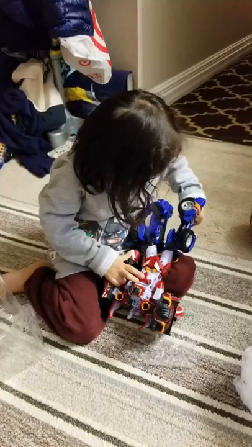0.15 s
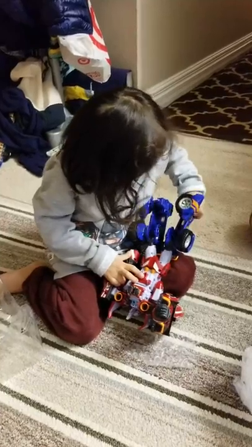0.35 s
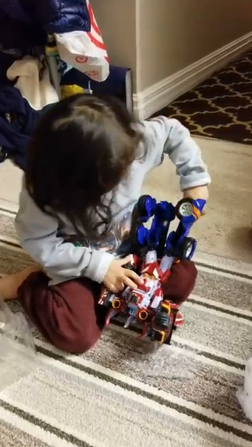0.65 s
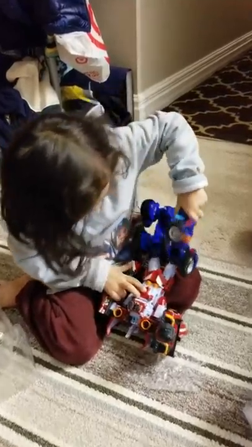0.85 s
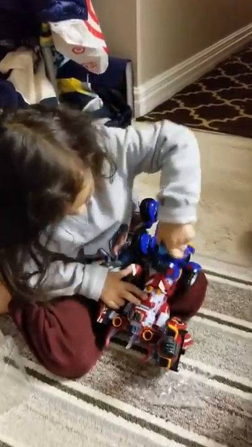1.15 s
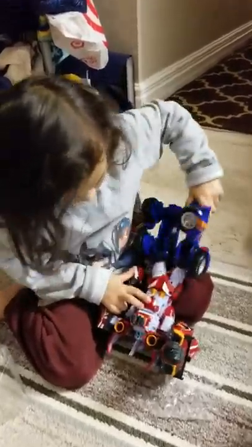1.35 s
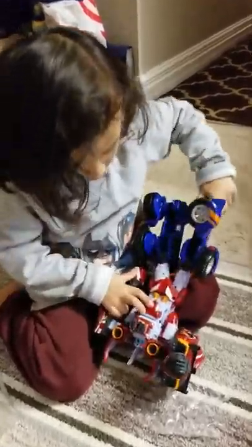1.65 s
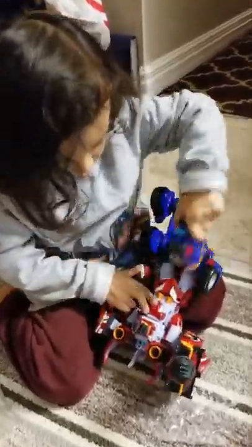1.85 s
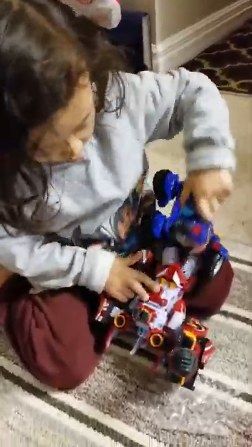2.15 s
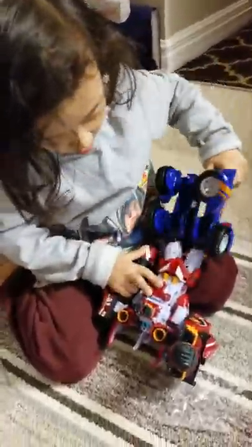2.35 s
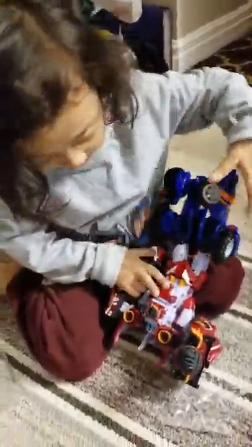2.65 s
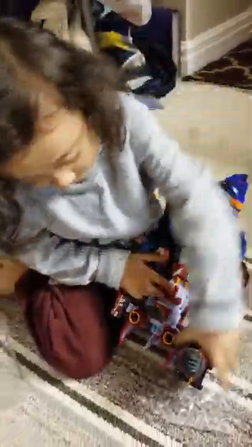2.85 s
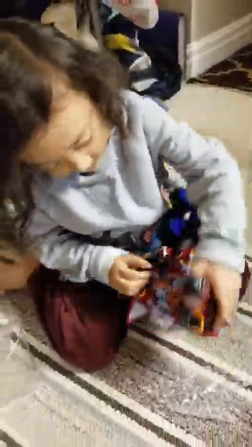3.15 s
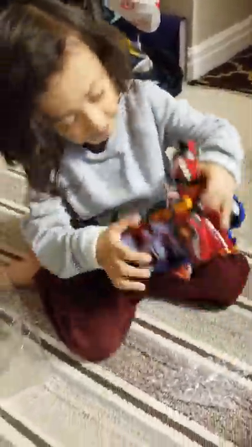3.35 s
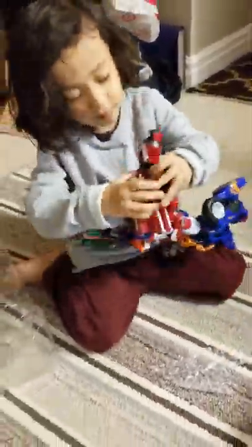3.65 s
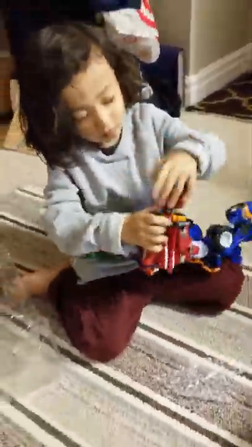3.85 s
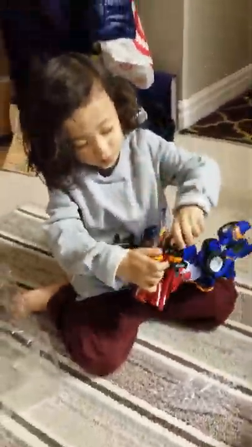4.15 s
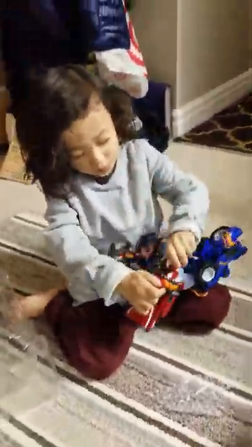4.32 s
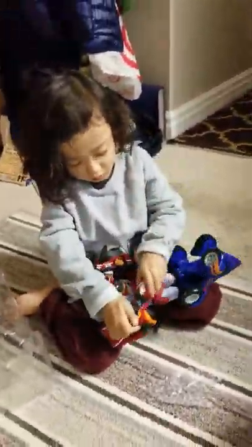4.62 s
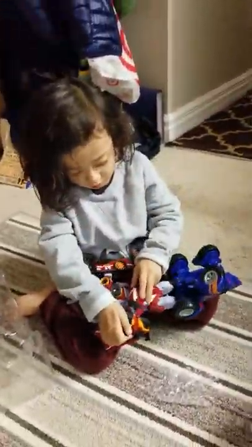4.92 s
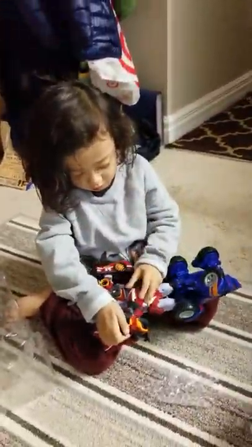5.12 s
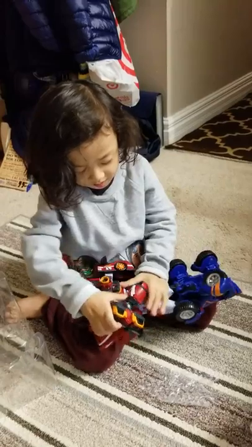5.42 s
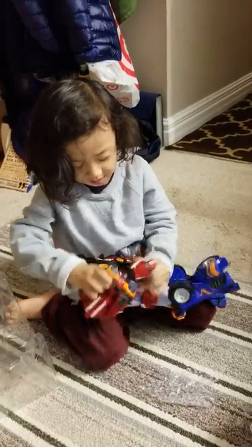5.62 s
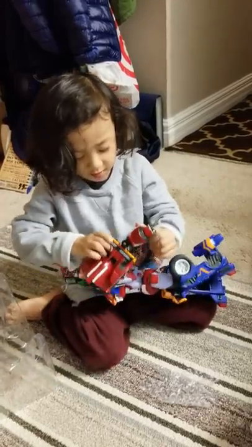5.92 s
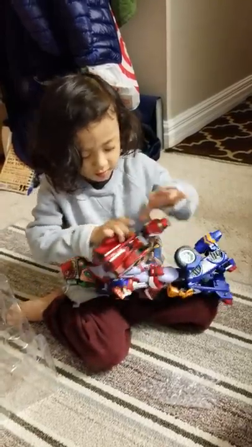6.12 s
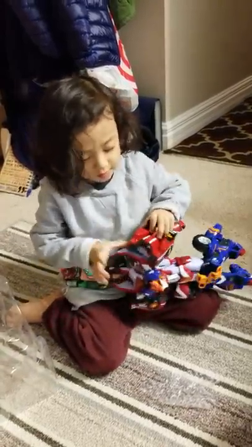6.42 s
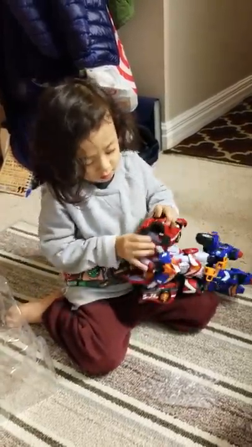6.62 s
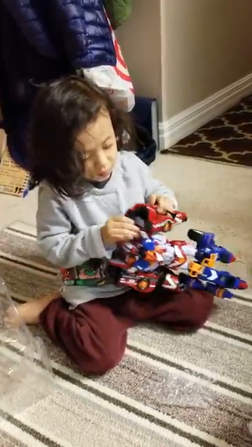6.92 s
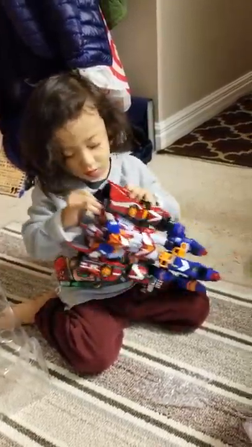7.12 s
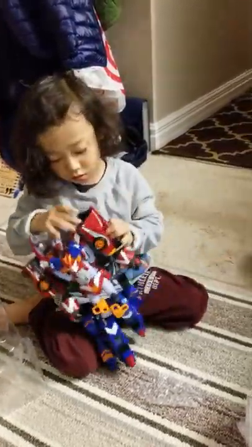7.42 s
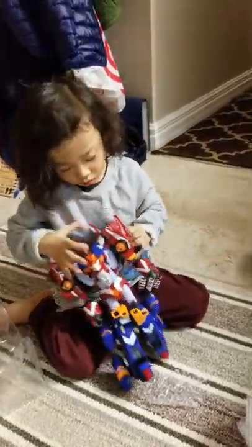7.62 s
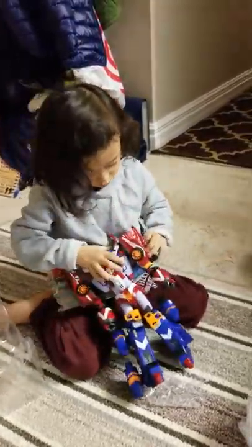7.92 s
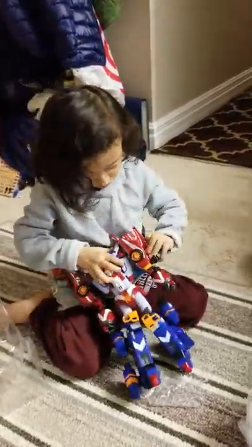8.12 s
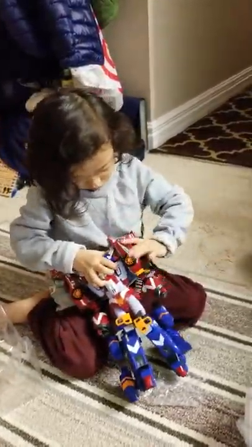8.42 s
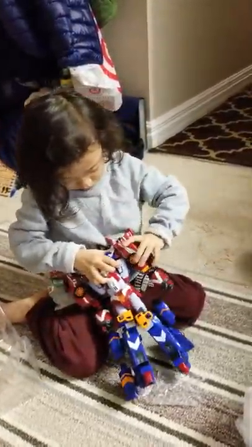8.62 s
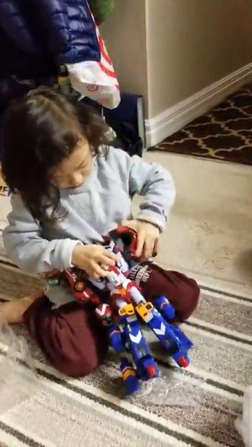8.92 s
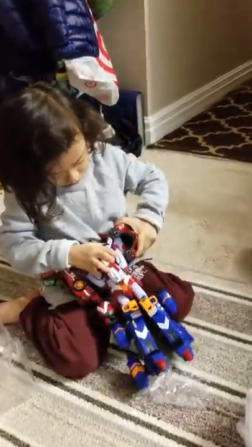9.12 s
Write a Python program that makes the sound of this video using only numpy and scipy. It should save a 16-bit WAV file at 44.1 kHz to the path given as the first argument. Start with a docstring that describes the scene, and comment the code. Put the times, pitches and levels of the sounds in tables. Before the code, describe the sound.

A hard plastic toy robot is handled about a metre from the microphone in a small, quiet room with little echo and a faint low hum. From about 0.6 to 2.3 seconds its ratchet joints click in several quick runs, each click crisp, with a hollow ring and a slight rattle. Between 2.8 and 3.8 seconds sleeves rub softly on the plastic and panels knock dully as the toy is turned. Sharp snaps of catches and hinges cluster from 4.1 to 4.6 seconds. After a lull, another tight burst comes at 5.6 to 5.8 seconds. From 6.2 to 7.8 seconds there are lighter clicks, knocks and a jiggle of loose parts, with more sleeve rustle. A few faint ticks lead to a last flurry of snaps from 8.5 to 8.8 seconds and two clicks at around 9.1 seconds.

```python
"""A quiet, carpeted room; about a metre from a phone's two microphones a child folds a plastic toy robot.
Ratchet joints step, panels knock and catches snap: each contact cracks, rings the hard, hollow shell
and shakes loose parts. Sleeves rub on the toy as it is turned in the hands. The small room answers
with two close echoes and a short tail; room tone and a faint mains hum lie underneath."""
import sys
import numpy as np
from scipy import signal
from scipy.fft import rfft, irfft, next_fast_len
from scipy.io import wavfile
from scipy.ndimage import uniform_filter1d

SR = 44100
rng = np.random.default_rng(int(sys.argv[2]) if len(sys.argv) > 2 else 0)


def transcribe(signal):
    """Save signal, clipped to [-1, 1], as a 16-bit WAV file at the path in sys.argv[1]."""
    frames = np.atleast_2d(signal).T
    limited = np.clip(frames, -1, 1)
    pcm = np.round(limited * 32767).astype(np.int16)
    wavfile.write(sys.argv[1], SR, pcm)


N = 408807

# colour of the room tone: (frequency [Hz], gain [dB])
AIR_COLOUR = [(15, -44.5), (25, -14), (117, -4.5), (149, -12), (263, -25.5), (301, -20.5), (439, -29.5),
              (962, -34.5), (1100, -29.5), (1740, -31.5), (2480, -41), (8590, -51.5), (14000, -43),
              (16000, -51.5)]
# drift of the room tone: (time [s], relative level [dB])
AIR_DRIFT = [(0.0, -67.5), (1.16, -62.5), (2.04, -66), (4.3, -66), (6.4, -74), (7.5, -68.5), (9.27, -67)]
# colour of a sleeve on plastic: (frequency [Hz], gain [dB])
CLOTH_COLOUR = [(100, 0.5), (250, -6), (600, -6.5), (1000, -6.5), (1900, 4), (3200, -5), (6000, 0),
                (10000, -8), (12700, -6.5), (16000, -14)]
# each fold works another joint or catch, whose voice holds until the next:
# (start [s], treble [dB], struck part's pitch [Hz], its ring [dB], shell re crack [dB],
#  shell centre [Hz], thump re crack [dB], rattle re contact [dB], pan to the left [dB])
FOLDS = [(.5, -3.5, 3200, 5.5, -5, 2134, -27.5, 1, -2), (1.1, -11, 3850, 1.5, -7, 2120, -28, 0, 0),
         (1.7, -10, 5900, -2, -8, 2140, -29.5, 1, -0.5), (2.05, -9, 3800, 2.5, -8.5, 2080, -30, -2, 1),
         (2.7, -9.5, 5320, 4, -6, 1760, -22.5, -4, 0.5), (3.6, -2.5, 4260, 7, -9, 1570, -42, -4, -1.5),
         (4.2, -3, 5700, 2.5, -6.5, 2400, -43.5, -7, 3), (4.4, 2.5, 4080, 10, -6.5, 2420, -50, -18.5, 2),
         (4.56, -7.5, 5750, -2, -7, 2400, -36.5, -10, 1.5),
         (4.63, -2, 5800, 3.5, -8, 2336, -25.5, -10.5, 4.5),
         (4.8, -4.5, 5840, 0, 1.5, 2010, -21.5, -4.5, 21),
         (5.55, -2, 5100, 11.5, -10.5, 1614, -36, -10.5, -0.5),
         (5.65, -1, 4300, 5.5, -9, 1676, -34, -22, 0.5), (6.1, -14, 5800, 2, -1.5, 1894, -26, 1, -0.5),
         (6.8, -7.5, 9570, 6.5, -10, 1980, -40, 1.5, 5.5),
         (7.3, -15.5, 5200, 4.5, 2.5, 2220, -16.5, -7.5, -1.5),
         (7.95, -13, 5460, 8.5, -6.5, 1800, -27.5, 1, -4.5), (8.48, -13, 5760, 1.5, -8, 1784, -26.5, 2, 0),
         (8.62, -2.5, 5800, 6, -11, 2360, -32, -13, 2), (9.0, -3.5, 5220, 1, -16, 2300, -37, -10, 1.5)]
# swings of the ratchet joint: (start [s], teeth [count], first gap [s], middle gap [s], last gap [s])
SWINGS = [(.6018, 11, .063, .038, .0385), (1.1701, 6, .0339, .022, .0228), (1.3692, 2, .0553, .0553, .0553),
          (1.7379, 8, .0188, .0264, .0451), (2.104, 7, .0278, .034, .0377)]
# force of each swing: (relative crack level in mid-swing [dB], thump growth over the swing [dB])
SWING_FORCE = [(-17, -4), (-15, 12), (-13, 7), (-18, -9.5), (-16.5, 13.5)]
# colour of a crack: (frequency [Hz], gain [dB])
CRACK_COLOUR = [(400, -31.5), (900, -24.5), (1300, -11), (2000, -4.5), (2900, -2.5), (3900, -0.5),
                (5000, 1), (6100, 3), (8000, 0), (10000, 1.5), (12300, 3.5), (15000, 2), (16000, -10.5)]
# modes of the hollow panels: (frequency [Hz], width [Hz], relative level [dB])
SHELL_MODES = [(1245, 63, 0), (1408, 180, 3), (1720, 61, -3.5), (1851, 47, -1.5), (1980, 57, -4),
               (2132, 91, -1.5), (2370, 140, -3.5), (2740, 320, -3)]
# low modes of the whole body: (frequency [Hz], width [Hz], relative level [dB])
BODY_MODES = [(120, 120, -10), (300, 150, -6.5), (516, 100, -9.5), (660, 110, -1), (830, 28, -5),
              (950, 120, -5.5)]
# decay of the room: (frequency [Hz], time to fall 60 dB [s])
ROOM_T60 = [(200, 0.59), (800, 0.27), (2000, 0.26), (5500, 0.3), (10000, 0.28), (15000, 0.16)]
# colour of the room's tail: (frequency [Hz], gain [dB])
ROOM_COLOUR = [(200, -3.5), (800, 6), (2000, 2), (5500, 0), (10000, -2), (15000, 1)]
# the toy is turned in the hands: (start [s], length [s], sleeve rub [dB], jiggle of loose parts [dB])
TURNS = [(2.8, 0.53, -58.5, -74), (3.066, 0.36, -59, -62.5), (3.467, 0.37, -61, -60.5),
         (5.425, 0.22, -66, -70.5), (6.187, .24, -76.5, -54), (6.9, 0.35, -70.5, -47.5),
         (7.321, 0.48, -57, -55), (8.19, 0.1, -66.5, -69.5), (8.476, 0.23, -65, -62)]
# dull knocks of the panels: (time [s], relative shell level [dB], shell centre [Hz])
KNOCKS = [(2.854, -36.5, 1680), (3.1067, -37, 1720), (3.2135, -31, 1930), (3.3028, -39, 2080),
          (3.3324, -38, 2150), (3.5399, -49, 1910), (3.6546, -50, 1270), (3.7991, -30, 2080),
          (4.0365, -50, 1847), (6.4108, -35.5, 1946), (7.206, -39.5, 1760), (7.2506, -57, 1920),
          (7.3348, -25.5, 1980), (7.6078, -38, 1800), (7.6755, -29.5, 1990), (7.9069, -56.5, 1490),
          (8.2154, -44.5, 1890), (8.5599, -39.5, 2000), (8.8035, -30.5, 1970)]
# catches and hinges snapping: (time [s], relative crack level [dB])
SNAPS = [(2.89, -29), (2.9074, -50), (3.2134, -44.5), (3.7384, -26.5), (3.7477, -36), (3.7691, -27),
         (4.0971, -30.5), (4.1803, -27.5), (4.223, -16.5), (4.2629, -17.5), (4.3248, -28.5), (4.3413, -18),
         (4.4182, -17), (4.4535, -16), (4.5367, -26), (4.5762, -18), (4.6177, -17.5), (4.6353, -18),
         (4.9354, -67.5), (5.3599, -60), (5.4636, -46.5), (5.5994, -17.5), (5.61, -15.5), (5.6178, -17),
         (5.629, -16), (5.6556, -17.5), (5.678, -17.5), (5.7285, -17), (5.772, -17.5), (6.1968, -38.5),
         (6.2368, -38), (6.3115, -22), (6.3434, -41), (6.485, -55), (6.897, -35), (6.9955, -28),
         (7.0668, -25), (7.1598, -29), (7.3348, -33.5), (7.3689, -33), (7.3857, -35.5), (7.4432, -38.5),
         (7.4644, -33.5), (7.5016, -43.5), (7.6653, -36.5), (7.7088, -42), (7.7591, -47), (7.8145, -60),
         (8.0536, -62.5), (8.1378, -57.5), (8.245, -54.5), (8.4127, -56), (8.4595, -56.5), (8.4972, -25.5),
         (8.5588, -43.5), (8.653, -31.5), (8.6873, -17.5), (8.7095, -31), (8.725, -24), (8.7359, -22),
         (8.7498, -24), (8.762, -23), (8.7824, -25.5), (8.804, -30), (9.0982, -27), (9.123, -25.5)]
# the left microphone's colour over the right's: (frequency [Hz], gain [dB])
MIC_BALANCE = [(700, 2), (1290, -5), (2300, 1.5), (4400, 0), (8100, 5), (15000, 3.5)]

CONTACTS = sum(row[1] for row in SWINGS) + len(SNAPS) + len(KNOCKS)
CONTACT_SAMPLES, ROOM_SAMPLES = 3072, 18432
CONTACT_HZ = np.fft.rfftfreq(CONTACT_SAMPLES, 1 / SR)


def undb(db):
    """Decibels to gain."""
    return 10 ** (np.asarray(db) / 20)


def colour(points, hz):
    """Gain of a (frequency [Hz], gain [dB]) outline at the given frequencies."""
    f, db = np.transpose(points)
    return undb(np.interp(np.log(hz + 1), np.log(f), db))


def unit(x):
    """Scale to unit energy along time."""
    return x / np.sqrt(np.sum(x ** 2, axis=-1, keepdims=True) + 1e-18)


def tint(x, points):
    """Filter by a (frequency [Hz], gain [dB]) outline."""
    size = next_fast_len(x.shape[-1])
    gain = colour(points, np.fft.rfftfreq(size, 1 / SR))
    return irfft(rfft(x, size) * gain, size)[..., :x.shape[-1]]


def place(times, sounds):
    """Lay stereo sounds on the time line."""
    out = np.zeros((2, N + sounds.shape[-1]))
    for start, sound in zip(np.clip(times * SR, 0, N).astype(int), sounds):
        out[:, start:start + sound.shape[-1]] += sound
    return out[:, :N]


def room_tone(hum_hz=116.3, hum_db=-74.5, alike_hz=450):
    """Low rumble, alike at both microphones, with thin unrelated hiss and a mains hum."""
    t = np.arange(N) / SR
    mid, side = rng.standard_normal((2, N))
    side = tint(side, [(alike_hz / 4, -11), (alike_hz, -5), (alike_hz * 3, 0)])
    air = unit(tint(np.array([mid + side, mid - side]), AIR_COLOUR)) * np.sqrt(N)
    air_db = np.interp(t, *np.transpose(AIR_DRIFT)) + 1
    hum = np.sqrt(2) * np.sin(2 * np.pi * hum_hz * t)
    return undb(air_db) * air + undb(hum_db) * hum


def sleeves(grain_db=2, slip_db=3, grain_samples=400):
    """Cloth slides over plastic with a soft, uneven swish that catches quickly and slips slowly."""
    catches, slips = (uniform_filter1d(np.repeat(rng.standard_normal(N // k + 1), k), k)[:N]
                      for k in (grain_samples, 10 * grain_samples))
    friction = rng.standard_normal((2, N)) * undb(grain_db * catches + slip_db * slips)
    return unit(tint(friction, CLOTH_COLOUR)) * np.sqrt(N)


def fold_at(times):
    """Index of the fold that is under way."""
    return np.searchsorted([row[0] for row in FOLDS], times) - 1


def voiced(times, db, weight_db=0):
    """Contacts of one fold: harder ones are brighter, more crack than body; weight adds thump, rattle."""
    fold = FOLDS[fold_at(times[0])]
    _, treble_db, part_hz, part_db, shell_db, shell_hz, thump_db, rattle_db, pan_db = fold
    force_db = db - np.mean(db)
    treble_db = treble_db + .3 * force_db
    shell_db = db + shell_db - .083 * force_db
    thump_db = db + thump_db + weight_db - .4 * force_db
    rattle_db = rattle_db + .74 * weight_db - .32 * force_db
    return np.broadcast_arrays(times, db, treble_db, part_hz, part_db,
                               shell_db, shell_hz, thump_db, rattle_db, pan_db)


def ratchet(ease_db=4):
    """The pawl drops over tooth after tooth as the joint changes speed smoothly, hardest in mid-swing."""
    swings = []
    for (start, teeth, *gaps_s), (peak_db, growth_db) in zip(SWINGS, SWING_FORCE):
        gaps = np.polyval(np.polyfit([-1, 0, 1], gaps_s, 2), np.linspace(-1, 1, teeth - 1))
        times = start + np.cumsum(np.append(0, gaps))
        along = np.linspace(-1, 1, teeth)
        swings.append(voiced(times, peak_db - ease_db * along ** 2, weight_db=growth_db * along / 2))
    return np.hstack(swings)


def bursts(decay_s, rise_s=.00078, apart=.34, lag_s=.00004):
    """Spectra of one short burst per contact; the microphones hear it partly alike, a moment apart."""
    t = np.arange(CONTACT_SAMPLES // 6) / SR
    noise = rng.standard_normal((CONTACTS, 3, len(t)))
    heard = noise[:, :1] + apart * noise[:, 1:]
    envelope = np.exp(-t / decay_s) * (1 - np.exp(-t / rise_s))
    lag = lag_s * rng.standard_normal((CONTACTS, 1, 1)) * np.array([[1], [-1]]) + 4 * lag_s
    return rfft(heard * envelope, CONTACT_SAMPLES) * np.exp(-2j * np.pi * CONTACT_HZ * lag)


def cracks(strike, treble_db, part_hz, part_db, part_width=.12, shelf_hz=7500):
    """Dense, heavily damped modes of the small struck part, one of which stands out."""
    shelf_db = np.clip(treble_db, -20, 10) / (1 + (shelf_hz / (CONTACT_HZ + 1)) ** 4)
    peak_db = part_db / (1 + ((CONTACT_HZ / part_hz - 1) / part_width) ** 2)
    return unit(irfft(strike * colour(CRACK_COLOUR, CONTACT_HZ) * undb(shelf_db + peak_db)))


def rings(modes, centre_hz, reach_hz, grip=.024, rough=.6):
    """Modes ring from one push and a little scuffing; the spot struck favours those around one pitch."""
    f = CONTACT_HZ[:CONTACT_SAMPLES // 6] + 1
    chance = rng.standard_normal((CONTACTS, 2, len(modes), 1))
    hz, width, db = np.transpose(modes)[:, :, None]
    hz = hz * (1 + grip * chance[:, 0])  # the grip detunes the modes
    weight = np.sign(chance[:, 1]) * undb(db) / np.sqrt(width) / (1 + ((hz - centre_hz) / reach_hz) ** 2)
    radiation = 1 / (1 + (hz / f / 2) ** 6)  # a panel radiates little below its own mode
    ring = np.sum(weight * radiation / (1 + 1j * (f - hz ** 2 / f) / width), axis=1, keepdims=True)
    push = np.exp(-2j * np.pi * f / 1000)  # peaks 1 ms into the contact
    scuff = bursts(decay_s=.0019, apart=.9, lag_s=.00002)[..., :len(f)]
    scuff /= np.std(scuff, axis=-1, keepdims=True)
    return unit(irfft(ring * (push + rough * scuff), CONTACT_SAMPLES))


def rattles(sound, first_s=.005, last_s=.022, fade_s=.012, scatter_db=5, decay_s=.0017, count=6):
    """Loose parts land one after another just after each contact, each a burst, ever more softly."""
    chance = rng.random((CONTACTS, 2, count))
    delay = first_s + (last_s - first_s) * (np.arange(count) + chance[:, 0]) / count
    size = np.exp(-delay / fade_s) * undb(scatter_db * (2 * chance[:, 1] - 1))
    landings = np.zeros((CONTACTS, CONTACT_SAMPLES))
    np.put_along_axis(landings, (delay * SR).astype(int), size, axis=1)
    envelope = signal.lfilter([1], [1, -np.exp(-1 / (decay_s * SR))], landings)[:, None]
    noise = rng.standard_normal((CONTACTS, 3, CONTACT_SAMPLES))
    clatter = unit(envelope * (noise[:, :1] + noise[:, 1:]))
    return irfft(rfft(sound) * rfft(clatter))


def room(sounds, near_s=.0099, wall_s=.0156, build_s=.0013, sway_s=.00021, count=16):
    """Two near surfaces echo over a short diffuse tail; the echoes shift as the toy is moved."""
    t = np.arange(ROOM_SAMPLES) / SR
    hz = np.fft.rfftfreq(len(t), 1 / SR)
    noise = rfft(rng.standard_normal((count, 2, len(t)))) * colour(ROOM_COLOUR, hz)
    centres, t60s = np.transpose(ROOM_T60)
    tail = 0
    for share, t60 in zip(np.eye(len(centres)), t60s):
        band = irfft(noise * np.interp(np.log(hz + 1), np.log(centres), share))
        tail = tail + band * np.exp(-np.log(1000) * t / t60)
    responses = undb(-4.5) * unit(tail * (1 - np.exp(-(t / build_s) ** 2)))
    for response, sway in zip(responses, sway_s * rng.standard_normal(count)):
        response[0, int((near_s + sway) * SR)] += undb(-15)  # nearest surface faces the left microphone
        response[:, int((wall_s - sway) * SR)] += undb(-20)
    return irfft(rfft(sounds, len(t)) * rfft(responses)[np.arange(len(sounds)) % count])


def turning(attack_s=.078, release_s=.06):
    """Gains of the sleeve rub and of the jiggle: each turn of the toy swells, holds and dies away."""
    t = np.arange(N) / SR
    gains = np.zeros((2, N))
    for start, length, *db in TURNS:
        swell = np.clip((t - start) / attack_s, 0, 1)
        fade = np.exp(-np.maximum(t - start - length, 0) / release_s)
        gains = np.maximum(gains, undb(db)[:, None] * swell * fade)
    return gains


def jiggle(taps_per_s=120, scatter_db=5, tick_db=-14, parts=4):
    """Many tiny contacts of a few loose parts tick and ring the panels, each part in its own way."""
    taps = (rng.random((parts, 1, N)) < taps_per_s / parts / SR) * undb(scatter_db * rng.standard_normal(N))
    t = np.arange(CONTACT_SAMPLES) / SR
    hz, width, db = np.transpose(SHELL_MODES)[:, :, None]
    phase = 2 * np.pi * rng.random((parts, 2, len(SHELL_MODES), 1))
    modes = undb(db) * hz / hz.mean() * np.sin(2 * np.pi * hz * t + phase) * np.exp(-np.pi * width * t)
    # panels radiate only around their modes
    ring = tint(modes.sum(axis=2), [(700, -25.5), (1200, 4), (2600, 7.5), (4000, -18.5)])
    tick = rng.standard_normal((parts, 2, len(t))) * np.exp(-t / .003)
    tick = tint(tick, [(1000, -33), (3000, 10), (6500, .5), (14000, -16.5)])
    tapping = signal.oaconvolve(taps, unit(ring) + undb(tick_db) * unit(tick), axes=2)
    return unit(tapping.sum(axis=0)[:, :N]) * np.sqrt(N)


def knocks(treble_db=-12.5, part_hz=4400, part_db=3.5, rattle_db=-11, pan_db=0):
    """Panels bump together: nearly all shell, with little crack or thump."""
    times, shell_db, shell_hz = np.transpose(KNOCKS)
    crack_db, thump_db = shell_db - 13.5, shell_db - 33.5
    return np.array(np.broadcast_arrays(times, crack_db, treble_db, part_hz, part_db,
                                        shell_db, shell_hz, thump_db, rattle_db, pan_db))


def snaps():
    """Catches and hinges snap, each with the voice of the part that is being folded."""
    times, db = np.transpose(SNAPS)
    fold = fold_at(times)
    return np.hstack([voiced(times[fold == k], db[fold == k]) for k in np.unique(fold)])


def toy(facing_db=1.5):
    """Each contact cracks, rings the panels, thumps the body and shakes loose parts; the room answers."""
    contacts = np.hstack([ratchet(), snaps(), knocks()])[:, :, None, None]
    times, crack_db, treble_db, part_hz, part_db, shell_db, shell_hz, thump_db, rattle_db, pan_db = contacts
    # no two contacts are quite alike in colour or direction
    treble_scatter, pitch_scatter, pan_scatter = rng.standard_normal((CONTACTS, 3)).T[:, :, None, None]
    treble_db = treble_db - treble_scatter
    part_hz = part_hz * np.exp(.055 * pitch_scatter)
    pan_db = pan_db - .5 * pan_scatter
    span = np.sqrt(.004 * SR)  # levels are energies spread over 4 ms
    crack = span * undb(crack_db - 1) * cracks(bursts(decay_s=.0014), treble_db, part_hz, part_db)
    # summed over all directions, a crack has the smooth spectrum of a single impulse
    impulse = rfft(signal.unit_impulse(CONTACT_SAMPLES, SR // 1000))
    all_round = span * undb(crack_db - .1) * cracks(impulse, treble_db, part_hz, part_db)
    shell = span * undb(shell_db - 4) * rings(SHELL_MODES, shell_hz, reach_hz=358)
    thump = span * undb(thump_db - 1) * rings(BODY_MODES, centre_hz=645, reach_hz=900)
    loose = undb(rattle_db) * rattles(undb(-6.5) * all_round + undb(3.5) * shell)
    sides = undb(pan_db * np.array([[1], [-1]]) / 2)
    sides = np.sqrt(2) * sides / np.linalg.norm(sides, axis=1, keepdims=True)
    direct = (crack + undb(facing_db) * shell + thump) * sides + loose  # the panels face the microphones
    reflected = room(all_round + shell + thump + loose)
    return place(times.ravel(), direct) + place(times.ravel(), reflected)


def scene(resting_rub_db=-77.5):
    """The toy a metre from two microphones of slightly different colour, over sleeves and room tone."""
    rub, shake = turning()
    left, right = toy() + shake * jiggle()
    half_balance = np.array(MIC_BALANCE) / [1, 2]
    plastic = np.array([tint(left, half_balance), tint(right, half_balance * [1, -1])])
    cloth = np.maximum(rub, undb(resting_rub_db)) * sleeves()
    return plastic + cloth + room_tone()


def record(dry):
    """The phone clips peaks at full scale and cuts the treble above 16 kHz."""
    lowpass = signal.ellip(8, .2, 70, 16000, fs=SR, output="sos")
    return signal.sosfilt(lowpass, np.clip(dry, -1, 1))


dry = scene()
out = record(dry)
transcribe(out)
```